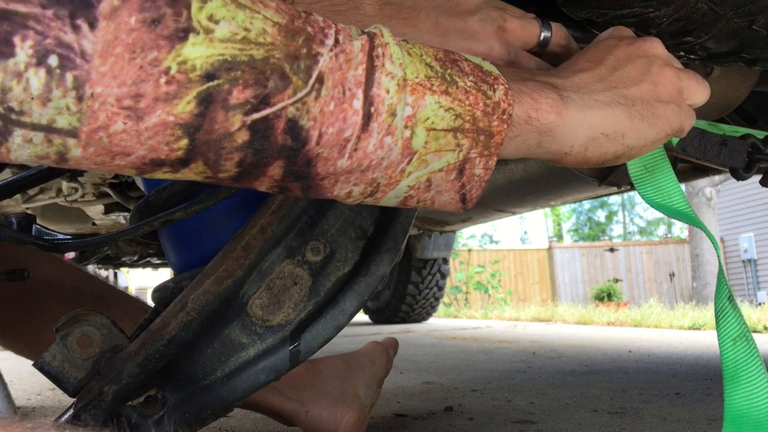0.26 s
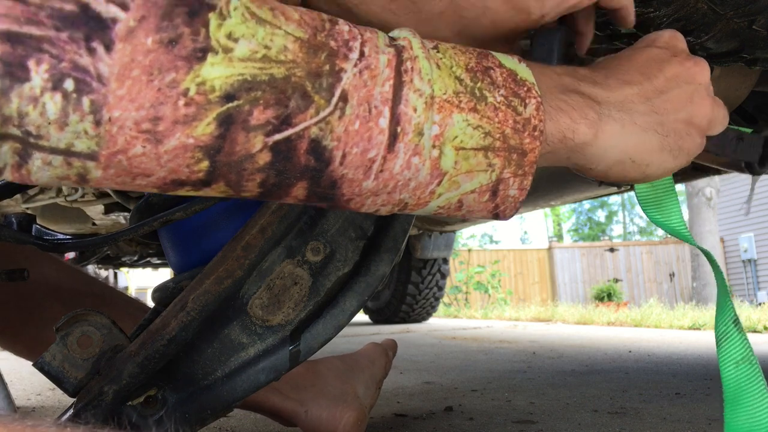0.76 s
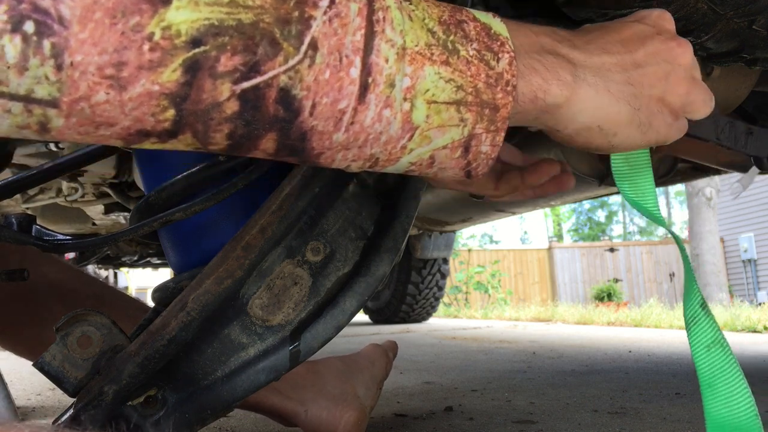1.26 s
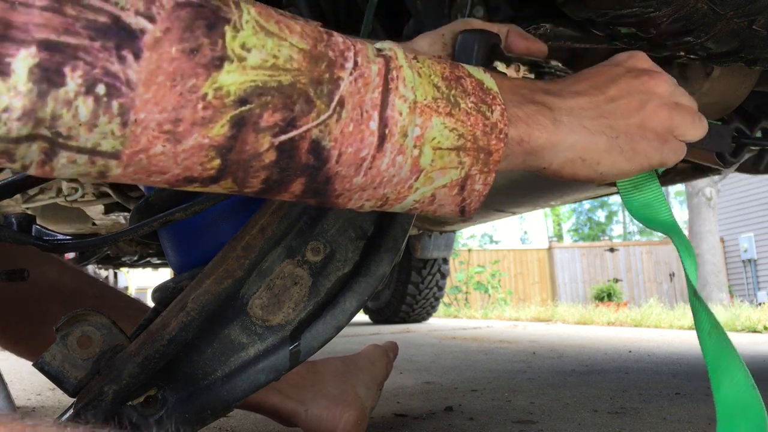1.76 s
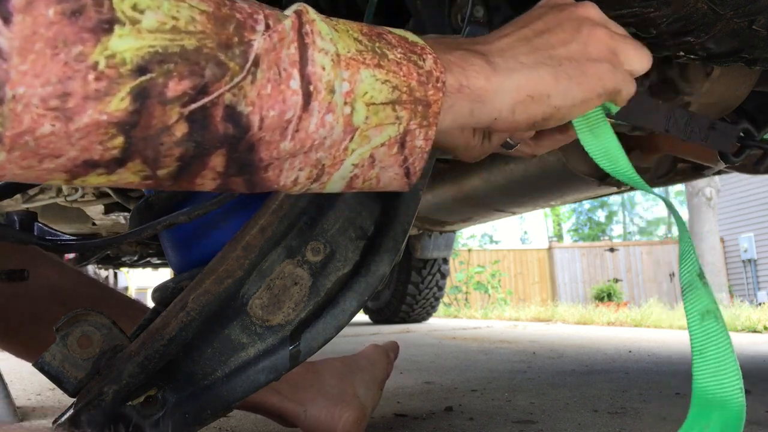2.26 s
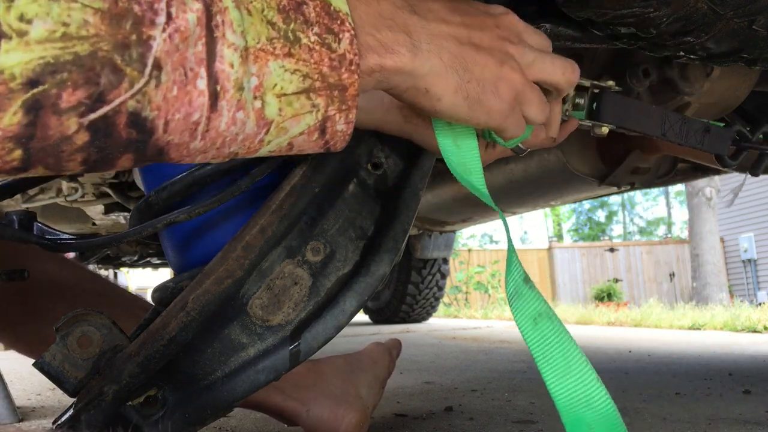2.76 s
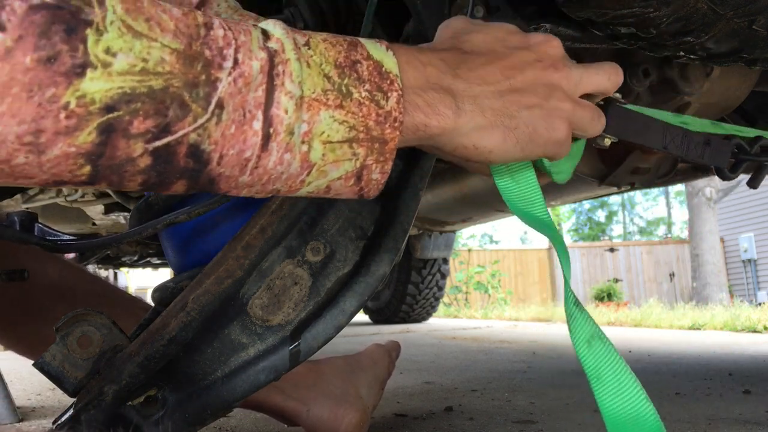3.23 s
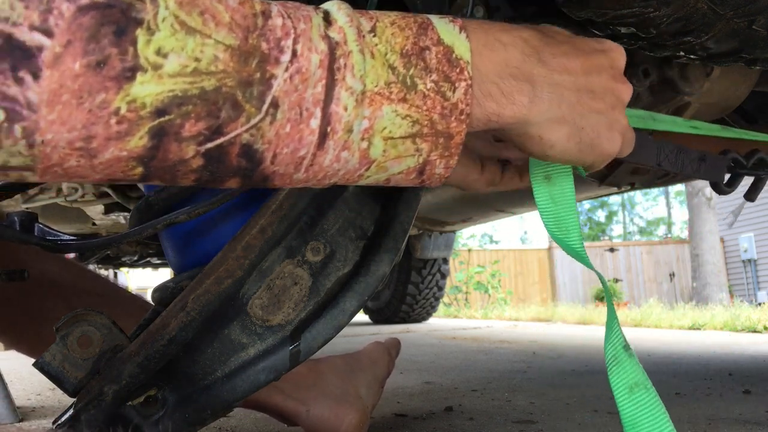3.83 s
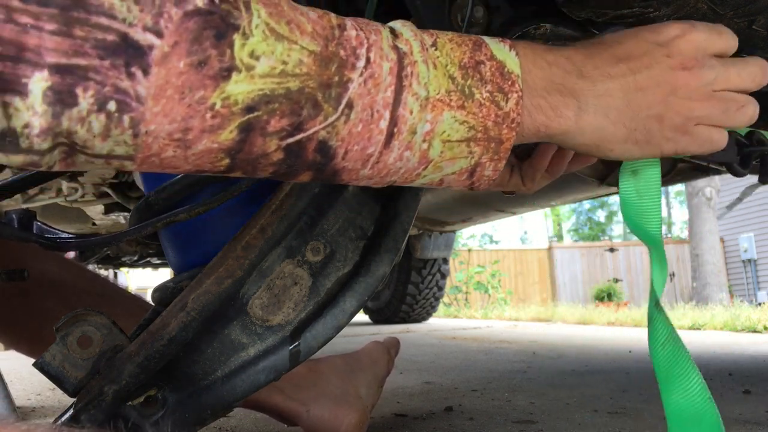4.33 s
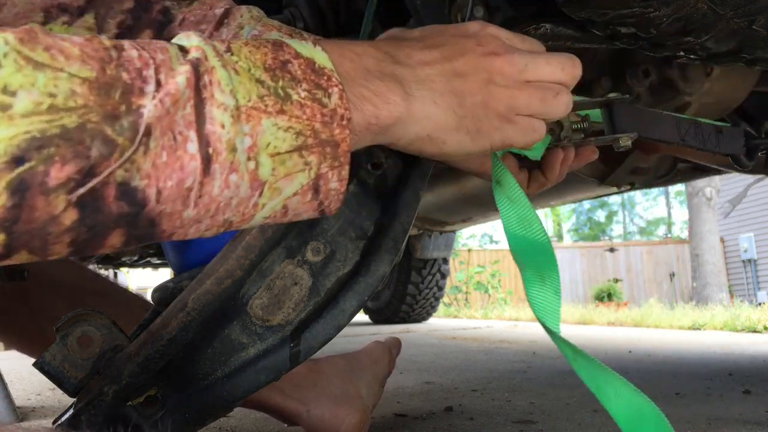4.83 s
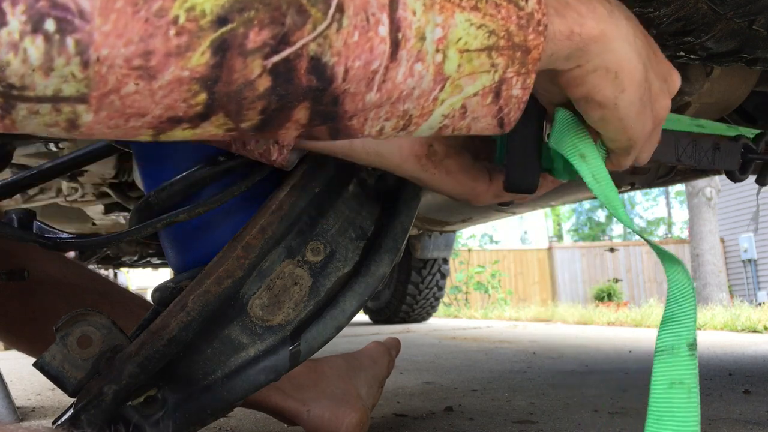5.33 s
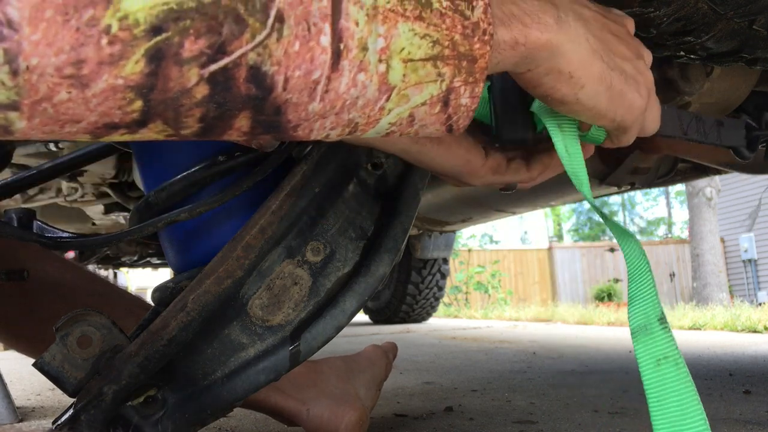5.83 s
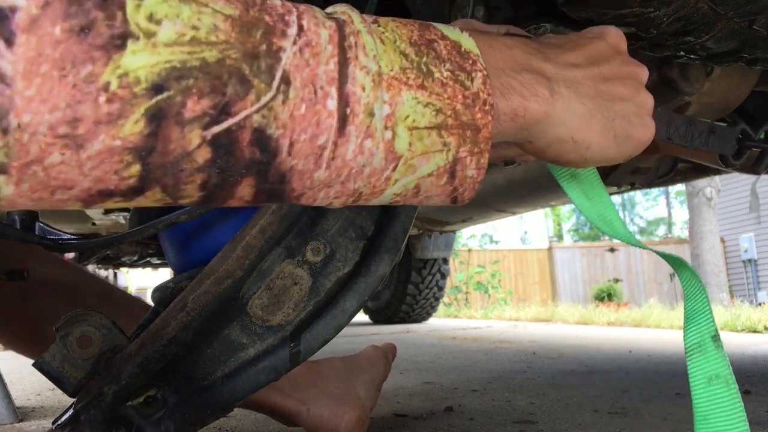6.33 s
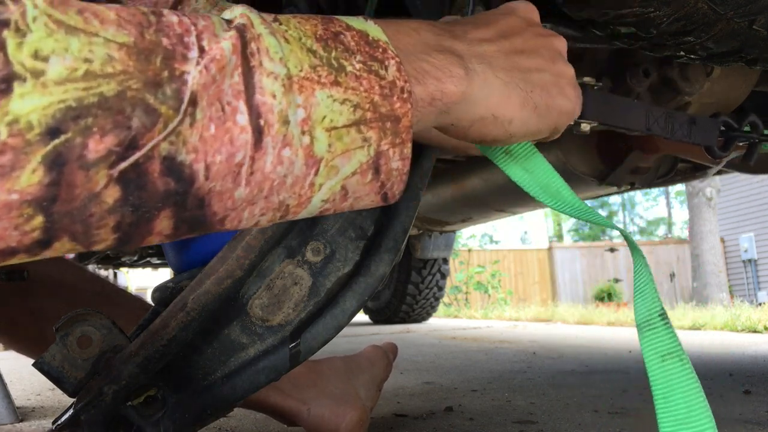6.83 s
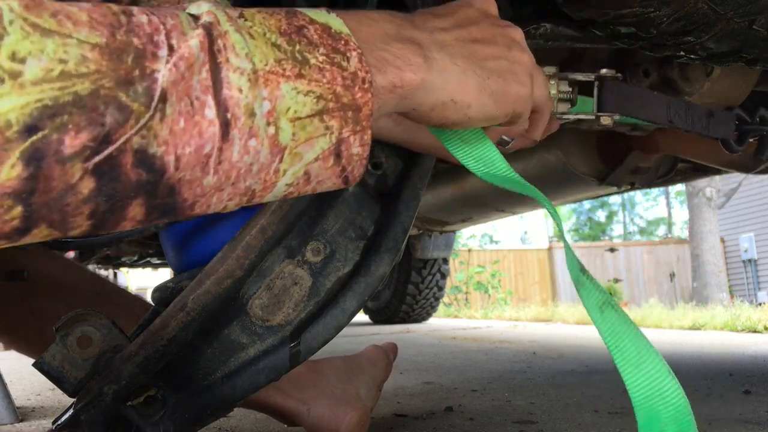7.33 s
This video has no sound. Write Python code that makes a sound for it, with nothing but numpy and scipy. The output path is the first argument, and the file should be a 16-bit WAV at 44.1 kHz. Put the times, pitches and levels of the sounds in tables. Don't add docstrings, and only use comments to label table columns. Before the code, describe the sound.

A nearby microphone hears dry webbing friction swelling and easing, small steel ticks and soft finger brushes. The chassis groans briefly near the start and again after the loudest ratchet clacks in the middle. The hollow space beneath the vehicle gives short reflections. Behind are quiet outdoor air, low wind rumble, a steady hum, thin insect whine and a repeating distant bird.

```python
import sys
import numpy as np
from scipy import signal
from scipy.fft import rfft, irfft, next_fast_len
from scipy.io import wavfile
from scipy.ndimage import map_coordinates

SR = 44100
rng = np.random.default_rng(int(sys.argv[2]) if len(sys.argv) > 2 else 0)


def wav_record(signal):
    frames = np.transpose(np.atleast_2d(signal))
    bounded = np.clip(frames, -1, 1)
    quanta = np.round(bounded * 32767).astype(np.int16)
    wavfile.write(sys.argv[1], SR, quanta)


def linear_from_db(decibels):
    return 10 ** (np.asarray(decibels, float) / 20)


N = 334278

# f/Hz, level/dB
RUSTLE = [(6000, -30), (9000, 6), (11000, 8), (14000, 7), (16000, -1)]
# blow t/s, peak level/dB, handle knock level/dB, brightness/dB, ring f/Hz
TEETH = [
    (4.1348, -4, -16.5, -13.5, 3330),
    (4.3723, -3, -14, -6.5, 3940),
    (4.7537, -1, -27.5, -8.5, 3330),
]
OVERTONE = 1.9


def unit(x):
    return x / np.sqrt(np.mean(x ** 2) + 1e-20)


def peak(x):
    return x / np.max(np.abs(x))


def decay(t, t60):
    return linear_from_db(-60 * t / t60)


def along(points, hz):
    f, v = np.transpose(points)
    return np.interp(np.log(hz + .1), np.log(f + .1), v)


def curves(rows):
    s, *cols = np.transpose(rows)
    return [np.interp(np.arange(N) / SR, s, c) for c in cols]


def wobble(rate):
    return map_coordinates(rng.standard_normal(int(N * rate / SR) + 4), [np.arange(N) * rate / SR])


def swells(rows, rest_db):
    s = np.arange(0, N + 64, 64) / SR
    power = linear_from_db(2 * rest_db)
    power = power + sum(linear_from_db(2 * db) * np.exp(-((s - mid) / half) ** 2) for mid, half, db in rows)
    return np.interp(np.arange(N) / SR, s, 10 * np.log10(power))


def filtered(x, response):
    m = next_fast_len(len(x) + 8192)
    return irfft(rfft(x, m) * response(np.fft.rfftfreq(m, 1 / SR)), m)[:len(x)]


def hiss(spectrum, size=N):
    return unit(filtered(rng.standard_normal(size), lambda hz: linear_from_db(along(spectrum, hz))))


def tone(hz):
    return np.sqrt(2) * np.sin(2 * np.pi * (np.cumsum(hz) / SR + rng.random()))


def body(peaks):
    def response(f):
        total = 0
        for k, (center, width, db) in enumerate(peaks):
            damping = 1j * f * width
            total = total + (-1) ** k * linear_from_db(db) * damping / (center * center - f * f + damping)
        return total
    return response


def ring(hz, db, t60, t):
    hz, db, t60 = (v[:, None] for v in (hz, db, t60))
    luck = rng.standard_normal((len(hz), 2))
    strength, mistuning = linear_from_db(db + 3 * luck[:, :1]), 1 + .02 * luck[:, 1:]
    return (strength * decay(t, t60) * np.sin(2 * np.pi * hz * mistuning * t)).sum(0)


def echoed(x, decays, size, gap):
    hz, t, z = signal.stft(rng.standard_normal(size), SR, nperseg=128)
    tail = signal.istft(z * decay(t, along(decays, hz)[:, None]), SR, nperseg=128)[1]
    return signal.fftconvolve(np.pad(x, (round(gap * SR), 0)), tail / np.linalg.norm(tail))


def add(track, s, sound):
    part = track[max(round(s * SR), 0):][:len(sound)]
    part += sound[:len(part)]


def air():
    # f/Hz, level/dB per Hz
    yard_spectrum = [(12, -35), (22, 11), (40, -15.5), (90, -6), (140, -7.5), (180, -11.5), (300, -17.5),
                     (430, -20), (560, -23.5), (800, -26.5), (3200, -28.5), (4100, -32.5), (7200, -34),
                     (16000, -53)]
    # middle t/s, half length/s, level/dB
    cloth = [(.98, 0.12, -62.5), (2.6, 1, -66.5), (5.7, 0.21, -61), (7.58, .15, -64)]
    # f/Hz, level/dB
    pressure = [(.5, -31), (1.5, 11.5), (3.5, 1), (6, -11.5), (12, -9), (25, -92), (50, -100)]
    # t/s, level/dB
    gusts = [(.1, -29.5), (.65, -34.5), (1.15, -32), (2.07, -28), (3.6, -27.5), (3.95, -24), (4.39, -23.5),
             (4.94, -25.5), (5.5, -31), (6.25, -23.5), (6.8, -16.5), (7.58, -25)]
    gust_s = .13
    yard = hiss(yard_spectrum)
    middle = filtered(yard, lambda hz: (hz > 900) & (hz < 3000))
    yard = yard / np.std(middle) * linear_from_db(swells(cloth, rest_db=-62) + .7 * wobble(6.1))
    swing = unit(tone(3.2 + 1.089 * wobble(1.1)) + .5 * hiss(pressure))
    return yard + linear_from_db(swells([(s, gust_s, db) for s, db in gusts], rest_db=-35)) * swing


def machines():
    # t/s, turns f/Hz, level/dB
    shaft = [(0, 75.9, -4), (2.5, 74.63, -2), (5, 74.23, 3), (7.58, 74.72, 2.5)]
    # multiple of the turning frequency, rms level/dB
    shaft_orders = [(1, -61), (2, -61), (3, -71), (4, -75), (5, -66.5), (6, -68.5), (10, -75.5)]
    # f/Hz, wander/Hz, rms level/dB
    drones = [(61, 1.75, -59), (131.4, 1.48, -58)]
    turns, shaft_db = curves(shaft)
    out = np.zeros(N)
    for order, db in shaft_orders:
        fading_db = 1.5 * wobble(6)
        out += linear_from_db(db + shaft_db + fading_db) * tone(order * (turns + 0.095 * wobble(3.045)))
    for hz, wander_hz, db in drones:
        fading_db = 3 * wobble(6)
        out += linear_from_db(db + fading_db) * tone(hz + wander_hz * wobble(3.9))
    return out


def insects():
    # t/s, line level/dB, octave level/dB
    whine = [(0, -92, -69), (1.3, -71.5, -68), (2.1, -72.5, -71), (2.55, -65.5, -72), (3, -76, -71),
             (4.6, -70.5, -70), (5.1, -73.5, -72.5), (5.8, -64, -70), (6.5, -65, -62.5), (7.58, -69.5, -73)]
    line_db, octave_db = curves(whine)
    hz = 3494 + 4 * wobble(25)
    line = linear_from_db(line_db + 0.52 * wobble(10)) * tone(hz)
    return line + linear_from_db(octave_db + 1.6 * wobble(8.6)) * tone(2 * hz)


def webbing():
    # t/s, level/dB
    pull = [(0.0, -77), (0.21, -66), (0.78, -54.5), (1.14, -61), (1.94, -57), (2.13, -58), (2.81, -60),
            (3.38, -57), (3.8, -59.5), (4.18, -58), (4.73, -56), (4.88, -63), (5.34, -62), (5.51, -59.5),
            (6.44, -54), (6.86, -55), (7.18, -56), (7.58, -57.5)]
    # f/Hz, level/dB
    weave = [(2000, -31), (3500, -5), (5000, -3), (6500, 1.5), (8000, 2), (9500, -3), (12000, -28),
             (16000, -32)]
    # t/s, delay/ms
    detour = [(0, 1.5), (2, 1.4), (4, 1.36), (5.9, 1.7), (6.5, 1.39), (7.58, 1.56)]
    pull_db, = curves(pull)
    rustle_db = -69.5 + 0.68 * (pull_db - np.median(pull_db))
    flicker = wobble(30)
    rub = linear_from_db(pull_db - 4.0 + 1.1 * flicker) * hiss(weave)
    rub = rub + linear_from_db(rustle_db - 2.0 + 1.3 * flicker) * hiss(RUSTLE)
    delay_ms = curves(detour)[0] + .04 * wobble(3)
    return rub + 0.47 * map_coordinates(rub, [np.arange(N) - delay_ms * SR / 1000])


def contacts():
    # t/s, peak level/dB, handle knock level/dB, brightness/dB, ring f/Hz
    taps = [(0.1328, -45.5, -14, -23, 3400), (0.2827, -25.5, -17, -20, 3300), (2.2105, -43, -13, -15, 3000),
            (2.899, -40, -8, -26, 3470), (3.206, -22, -10, -28.5, 1586), (3.5663, -27, -21.5, -20, 2910),
            (3.7012, -37, -12, -19, 2620), (3.7295, -25, -34, -33, 3400), (3.7301, -30, -31, -45, 4070),
            (3.969, -38.5, -16, -3, 2880), (4.0467, -35, -19, -14, 3200), (4.0998, -22, -13, -20, 2960),
            (4.1147, -13.5, -25, -11.5, 3030), (4.1253, -26, -14, -6, 5100), (4.3106, -42, -16, -15, 2920),
            (4.6934, -38, -8.5, -30, 3020), (5.3896, -33.5, -12, -17, 2700), (5.5418, -34.5, -20, -7, 2570),
            (5.8474, -25, -15, -18, 2780), (5.9108, -36, -19, -14, 2880), (7.4649, -39, -8.5, -28, 2600),
            (7.4869, -34.5, -12.5, -36, 2660)]
    # lead-in before it/s, level/dB, chatter after it/s, level/dB, rebound level/dB
    around = [(.0022, -15, .0039, -11.5, -34), (.0044, -39, .0024, -1, -11), (.0052, -8, .001, -7.5, -27)]
    rebound_s, light_knock_db, light_ring = 0.011, -34, 1.7
    rows = list(taps)
    for tooth, near in zip(TEETH, around):
        s, db, knock_db, bright_db, hz = tooth
        lead_s, lead_db, chatter_s, chatter_db, rebound_db = near
        rows += [(s - lead_s, lead_db, light_knock_db + 15, bright_db - 2, light_ring * hz),
                 (s, db, knock_db, bright_db, hz),
                 (s + chatter_s, chatter_db, light_knock_db, bright_db + 8.5, OVERTONE * hz),
                 (s + rebound_s, rebound_db, light_knock_db, bright_db + 1, hz)]
    return rows


def buckle():
    # f/Hz, level/dB, t60/s
    handle = [(1090, -17, 0.029), (1584, 3.5, 0.016), (1822, 11.5, 0.0065), (2073, -18, 0.012)]
    # f/Hz, level/dB
    steel_radiation = [(1800, -17.5), (2600, -8), (3500, -4.5), (5500, -2.5), (7500, -3.5), (10000, -5),
                       (13500, -11.5), (15600, -3.5), (16600, -53), (19000, -60)]
    # f/Hz, t60/s
    underside = [(500, 0.059), (2000, 0.061), (3500, .085), (8000, 0.078), (15000, 0.034)]
    steel_t60, treble_dies_hz = 0.048, 12000
    out, t = np.zeros(N), np.arange(SR // 18) / SR
    attack = 1 - np.exp(-t / .0005)
    for s, level_db, knock_db, bright_db, low_hz in contacts():
        high_hz = OVERTONE * low_hz * linear_from_db(rng.normal(0, .5))

        def colour(f):
            octaves = np.log2(f / 4500 + 1e-9)
            return along(steel_radiation, f) + (bright_db + 8.5) * np.clip(octaves / 1.6, 0, 1.2)

        hz = 2500 + 13500 * rng.random(140)
        t60 = steel_t60 / (1 + (hz / treble_dies_hz) ** 2) * linear_from_db(1.1 * rng.standard_normal(140))
        crowd = ring(hz, colour(hz), t60, t)
        grit = filtered(rng.standard_normal(len(t)), lambda f: linear_from_db(colour(f))) * decay(t, .012)
        low = np.sin(2 * np.pi * low_hz * t) * decay(t, .013)
        high = np.sin(2 * np.pi * high_hz * t) * decay(t, .015)
        focus = linear_from_db(-.65 * (bright_db + 13.5))
        own = focus * (0.35 * low + 0.11 * high)
        steel = peak(attack * (peak(crowd) + 1.2 * peak(grit) + own))
        knock = peak(attack * ring(*np.transpose(handle), t)) * linear_from_db(knock_db + 6.0)
        hit = linear_from_db(level_db) * filtered(steel + knock, lambda f: (1j * f / (650 + 1j * f)) ** 2)
        add(out, s, hit)
        add(out, s, linear_from_db(-11) * echoed(hit, underside, size=SR // 9, gap=.0016))
    s, db = TEETH[-1][:2]
    spring = decay(t, 0.022) * attack * np.sin(2 * np.pi * 8404 * t)
    add(out, s, linear_from_db(db - 3) * spring)
    return out


def scuffs():
    # t/s, peak level/dB, dull part level/dB
    brushes = [(0.423, -52, -15), (0.6692, -42, -15), (0.8246, -44, -4), (1.252, -45.5, -29),
               (1.3428, -50, -14), (1.583, -50, -7), (1.716, -47.5, -6.5), (1.8494, -45, -15),
               (2.086, -41.5, -14), (2.403, -45.5, -7), (2.4894, -42, -10.5), (2.6794, -59, 2.5),
               (3.2894, -49, -3.5), (3.344, -56, -9), (3.6944, -47, -15), (3.849, -52, -21),
               (3.998, -54, -10), (4.331, -41.5, -11), (4.666, -45, -8), (5.6925, -44, -13),
               (5.843, -34, -7), (5.9028, -39.5, -8), (5.9903, -52, -4.5), (6.1345, -44, -12),
               (6.484, -42.5, -13.5), (6.726, -44.5, -16), (6.862, -48.5, -4), (6.9994, -49.5, -4.5),
               (7.571, -44, -25)]
    out, t = np.zeros(N), np.arange(SR // 11) / SR
    u = t / 0.025
    swell = 3 * u * np.exp(-3 * u) * np.e
    for s, level_db, dull_db in brushes:
        bright = hiss([(1500, -62), (2800, 15.5), (7000, 18), (15000, 1.0)], size=len(t))
        dull = hiss([(300, -22), (800, -1.5), (1700, -0.5), (2600, -7), (4000, -18)], size=len(t))
        add(out, s - .006, linear_from_db(level_db - 10) * (bright + linear_from_db(dull_db + 9) * dull) * swell)
    return out


def crackle():
    # middle t/s, half length/s, level/dB
    tightening = [(.74, .12, -65), (1.9, 0.2, -70), (3.4, .1, -70), (3.84, 0.028, -63), (4.0, .12, -68),
                  (4.38, .12, -66), (4.7, 0.093, -66.5), (5.74, .1, -68), (6.5, .12, -72), (7.1, 0.11, -71)]
    # t/s, peak level/dB
    snaps = [(3.4037, -51), (3.6955, -49), (3.729, -34), (3.84, -54), (3.9155, -51), (3.9679, -46),
             (3.98, -49), (4.0178, -51), (4.0462, -45), (4.056, -49), (4.0827, -48), (4.2847, -53),
             (4.3106, -53), (4.5686, -58), (4.6594, -58), (4.6918, -49)]
    cracks_per_s, spread_db = 400, 2.5
    cracks = rng.random(N) < cracks_per_s / SR
    grain = unit(cracks * linear_from_db(spread_db * rng.exponential(size=N)))
    tail = decay(np.arange(SR // 25) / SR, .035)
    ticks = np.zeros(N)
    for s, db in snaps:
        add(ticks, s, linear_from_db(db - 6.5) * tail)
    dying = unit(signal.fftconvolve(grain, tail)[:N])
    return (linear_from_db(swells(tightening, rest_db=-84)) * dying + ticks) * hiss(RUSTLE)


def chassis():
    # t/s, peak level/dB, pitch f/Hz, scrape level/dB
    slips = [(.678, -41, 327, -26), (.717, -38, 596, -3), (.731, -31.5, 450, -27), (0.764, -30, 294, -20),
             (.788, -34, 328, -16), (.821, -32, 306, -15), (.843, -33.5, 780, -10), (.862, -34, 722, -11),
             (1.105, -44, 377, -3), (5.338, -39, 348, -13), (5.359, -34.5, 420, -5), (5.377, -36, 433, -24),
             (5.392, -27, 420, 2), (5.415, -29, 393, -33), (5.432, -34, 368, -26), (5.45, -33, 720, 0),
             (5.48, -39.5, 328, 1), (5.52, -45, 735, 5)]
    # f/Hz, width/Hz, level/dB
    pan_low = [(157, 26, 10.5), (292, 39, -6.5), (420, 34, -7)]
    pan_mid = [(722, 67, -2.5), (1045, 82, -8.5), (1286, 43, -5), (1620, 67, -10.5)]
    pan_high = [(2250, 410, 23.5), (3030, 230, 18), (4320, 100, 12), (6000, 1800, -24)]
    # f/Hz, t60/s
    hollow = [(100, 0.23), (400, 0.16), (750, 1.05), (1500, 0.59), (3000, 1.06), (8000, 1.06)]
    # t/s, level/dB, f/Hz, t60/s
    thuds = [(1.244, -40, 79.5, 0.15), (1.72, -42.5, 140.8, 0.22), (5.44, -39.5, 147, 0.15),
             (5.866, -39, 75, 0.087), (6.301, -38, 90.4, 0.14)]
    out, t = np.zeros(N), np.arange(SR // 5) / SR
    for s, db, pitch_hz, high_db in slips:
        t60 = 0.069 + 0.0018 * max(-high_db, 0)
        mid_db = 3 + 0.36 * high_db
        grit = rng.standard_normal((4, len(t))) * rng.exponential(size=len(t))
        parts = (pan_low, [(pitch_hz, 70, 0)], pan_mid, pan_high)
        low, own, mid, high = (unit(filtered(x, body(p))) for x, p in zip(grit, parts))
        shape = decay(t, t60) * (1 - np.exp(-t / 0.0063))
        shaken = peak(shape * (.5 * low + own + linear_from_db(mid_db) * mid + linear_from_db(high_db + 1.5) * high))
        ringing = linear_from_db(db - 13.5) * decay(t, 1.5 * t60) * np.sin(2 * np.pi * pitch_hz * t)
        add(out, s, ringing + linear_from_db(db + 1) * shaken)
    sent = out + 0.57 * filtered(out, body(pan_mid)) + linear_from_db(-1.0) * filtered(out, body(pan_high[2:3]))
    out = out + linear_from_db(-8) * echoed(sent, hollow, size=SR, gap=.012)[:N]
    for s, db, hz, t60 in thuds:
        onset = 1 - np.exp(-t / 0.015)
        add(out, s, 3 * linear_from_db(db) * decay(t, t60) * np.sin(2 * np.pi * hz * t) * onset)
    return out


def bird():
    # t/s, level/dB
    calls = [(1.17, -68), (1.485, -69), (1.825, -62.5), (2.15, -66), (2.455, -63.5), (2.775, -64.5),
             (3.11, -60.5), (3.445, -65), (3.775, -67)]
    out, t = np.zeros(N), np.arange(SR // 7) / SR
    fall = 1790 + 2285 * np.exp(-t / 0.015) + 900 * np.exp(-t / .06)
    for s, db in calls:
        glide = fall * (1 + 0.01074 * rng.standard_normal())
        flutter = 1 + 0.83 * np.sin(2 * np.pi * (45 * t + rng.random()))
        add(out, s, linear_from_db(db) * flutter * tone(glide) * np.sin(np.pi * t / t[-1]) ** 0.35)
    echo = rng.standard_normal(SR // 3) * decay(np.arange(SR // 3) / SR, 0.37)
    return linear_from_db(-2) * out + signal.fftconvolve(out, echo / np.linalg.norm(echo))[:N]


def scene():
    surroundings = air() + machines() + insects() + bird()
    handwork = webbing() + buckle() + scuffs() + crackle()
    return (surroundings + handwork + chassis())[None]


def roll_off(x):
    return signal.sosfilt(signal.butter(12, 16520, fs=SR, output="sos"), x)


def record(dry):
    rolloff = [(15780, 0), (15900, -26), (17000, -30)]  # f/Hz, level/dB
    soft = filtered(dry[0], lambda hz: linear_from_db(along(rolloff, hz)))
    return roll_off(soft[None])


dry = scene()
out = record(dry)
wav_record(out)
```